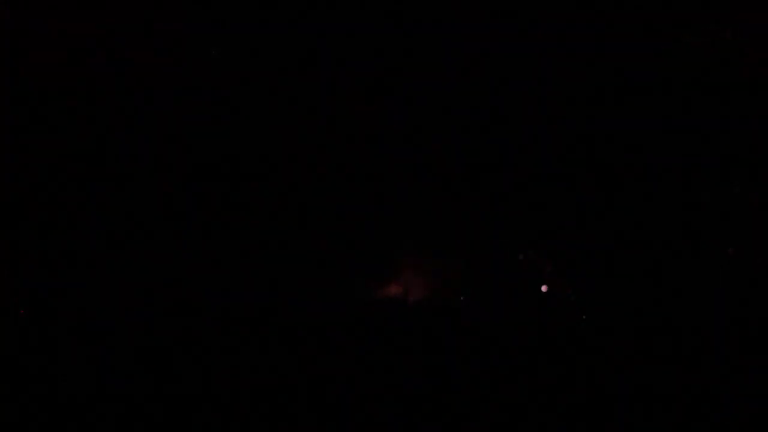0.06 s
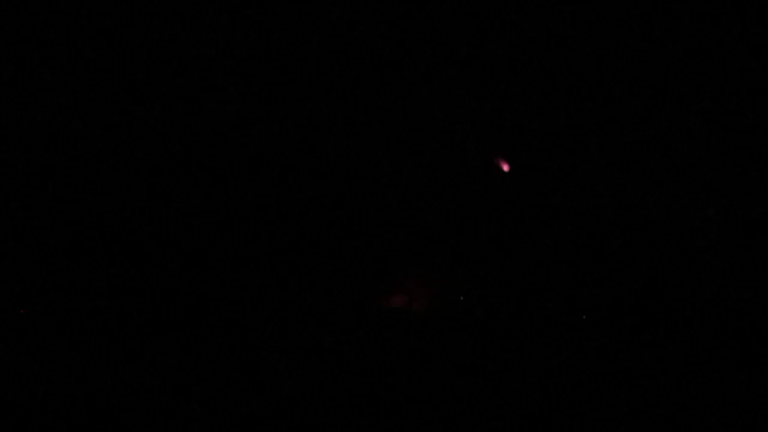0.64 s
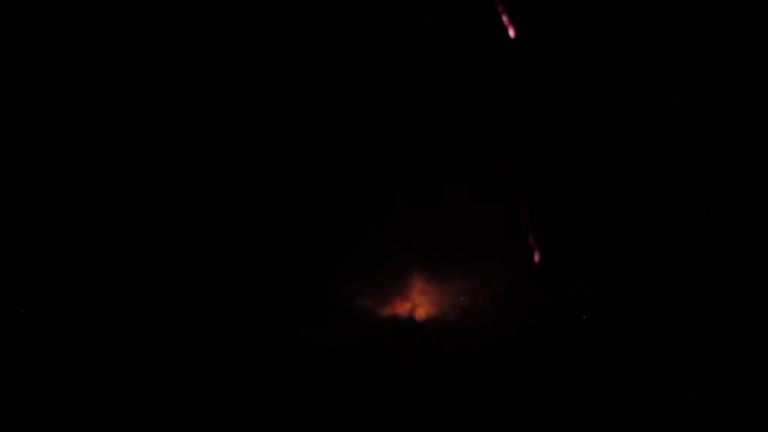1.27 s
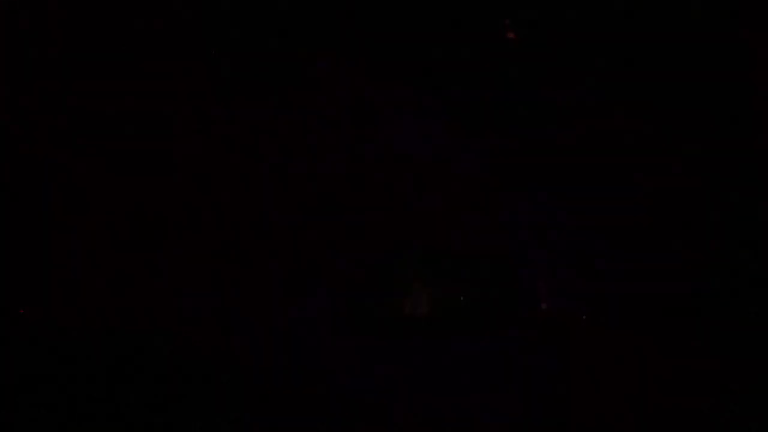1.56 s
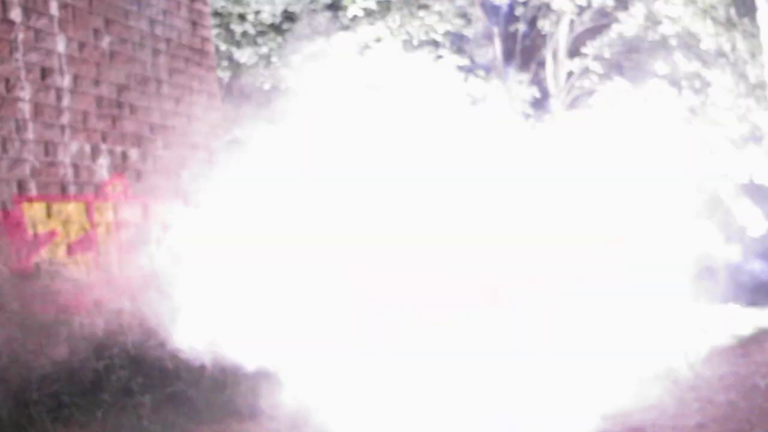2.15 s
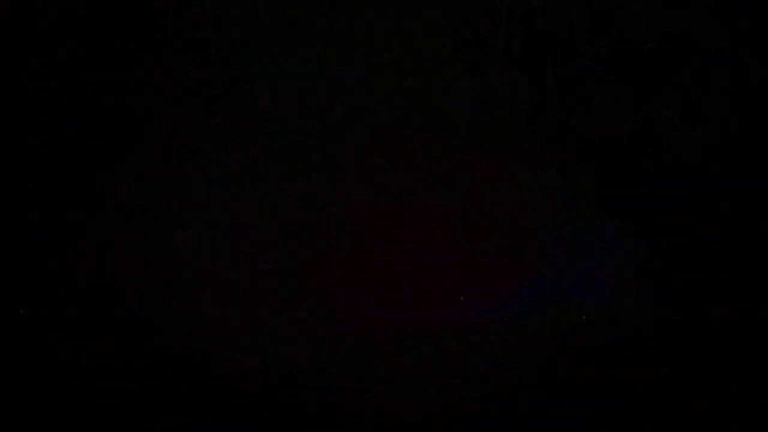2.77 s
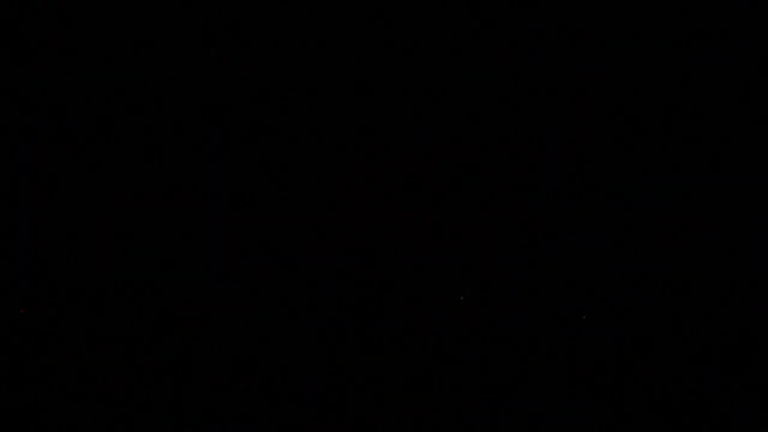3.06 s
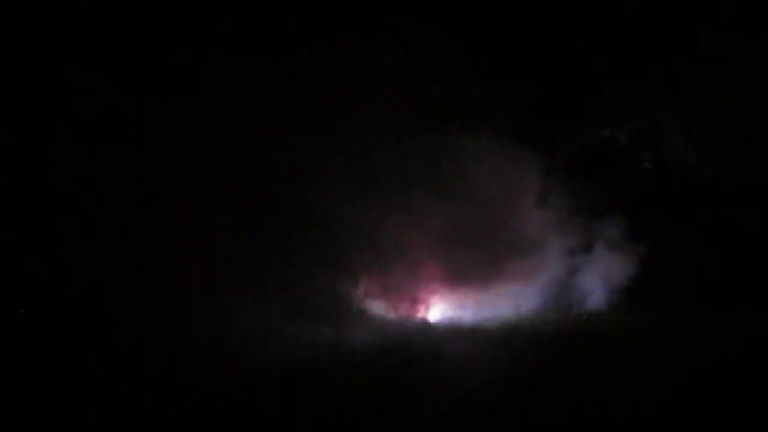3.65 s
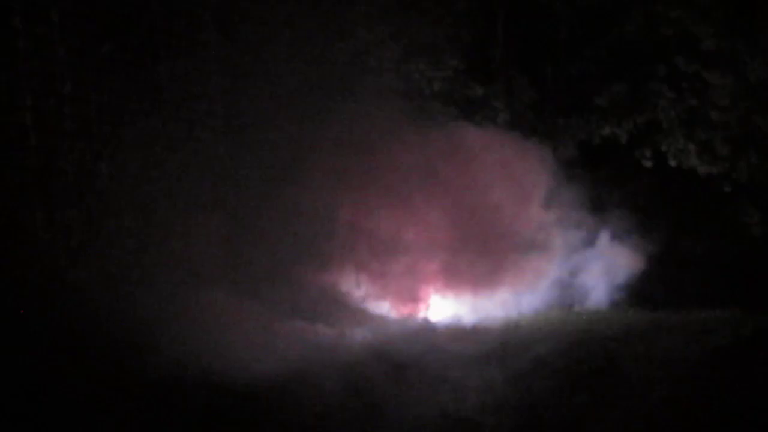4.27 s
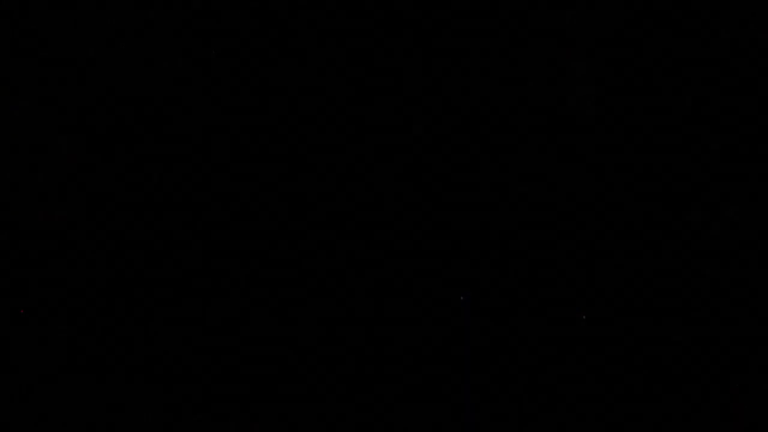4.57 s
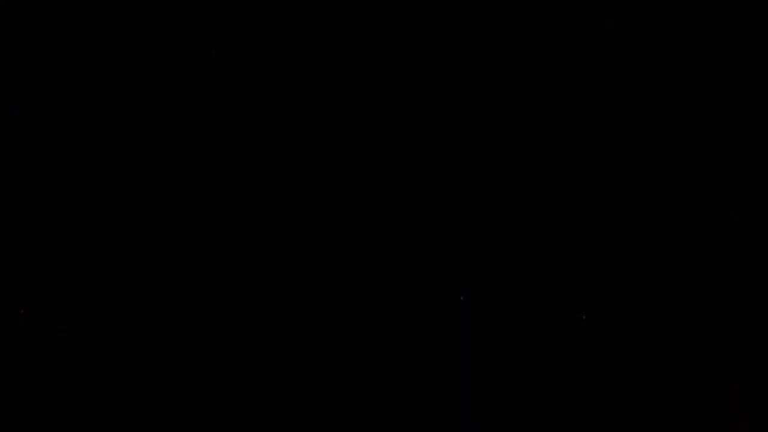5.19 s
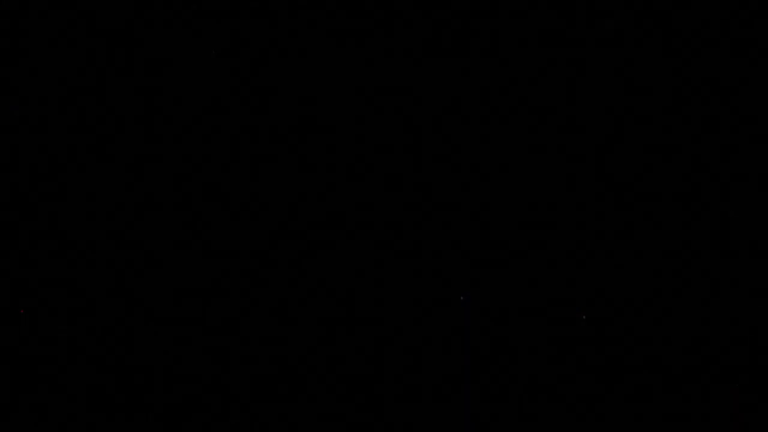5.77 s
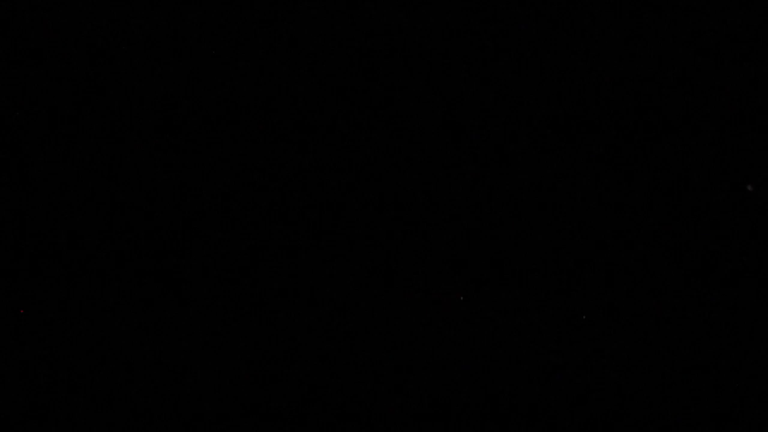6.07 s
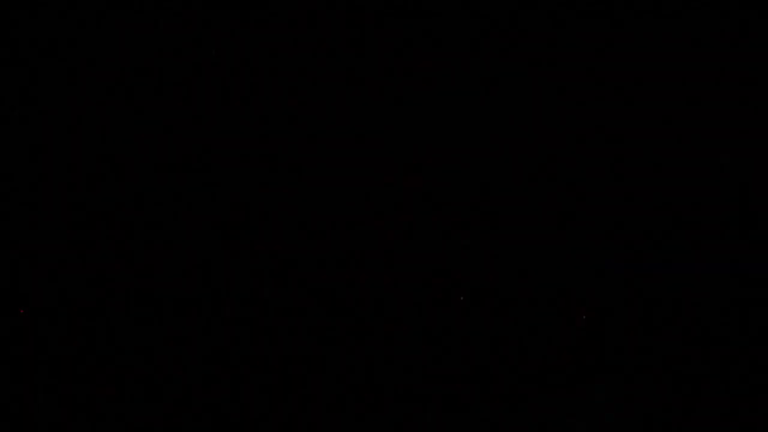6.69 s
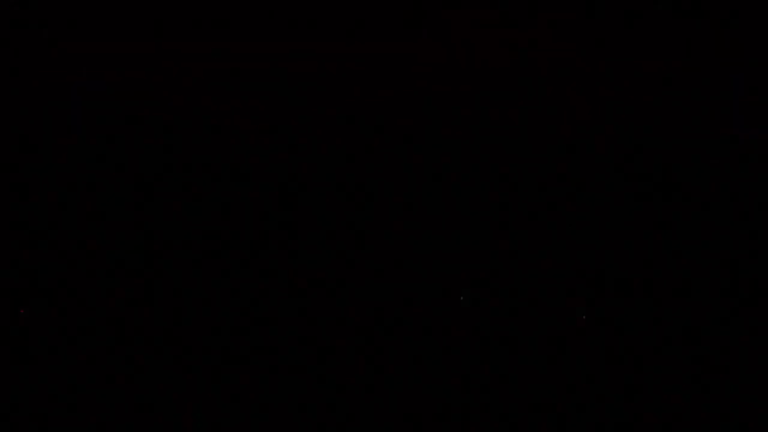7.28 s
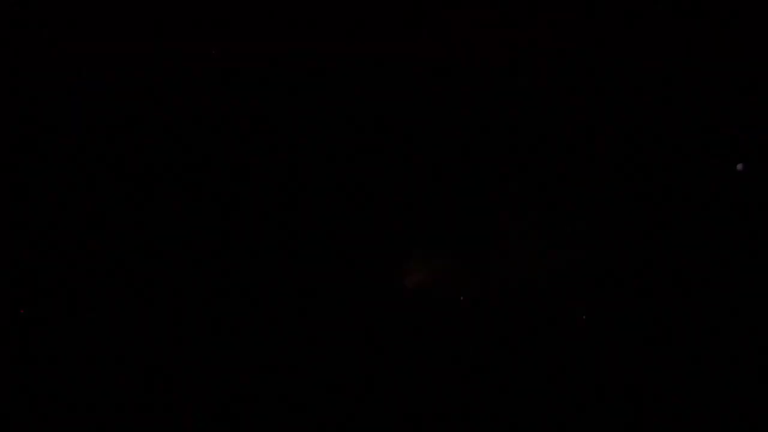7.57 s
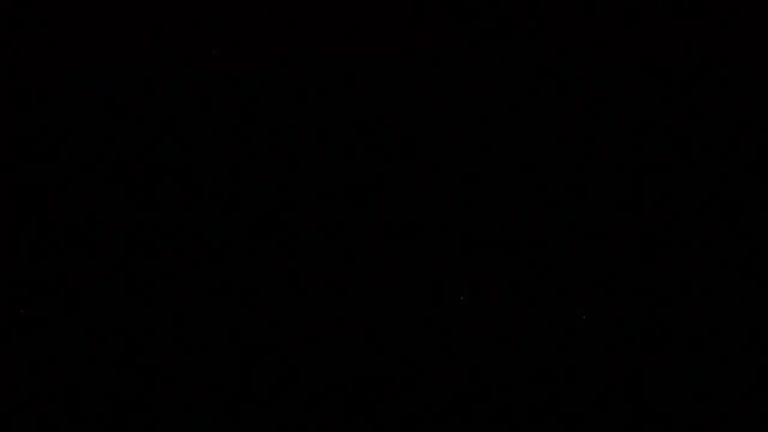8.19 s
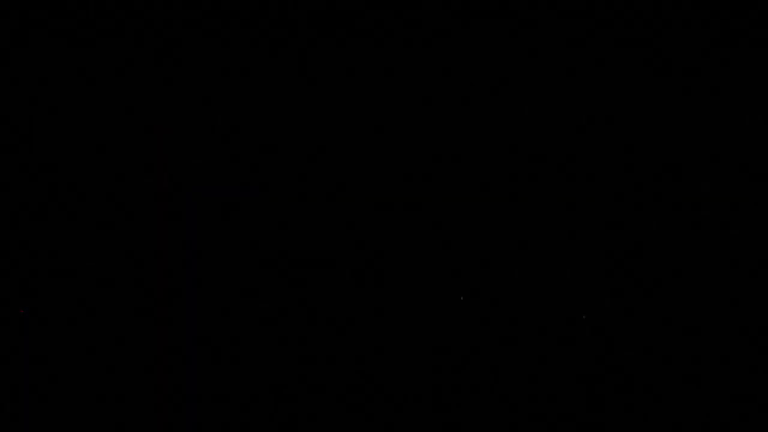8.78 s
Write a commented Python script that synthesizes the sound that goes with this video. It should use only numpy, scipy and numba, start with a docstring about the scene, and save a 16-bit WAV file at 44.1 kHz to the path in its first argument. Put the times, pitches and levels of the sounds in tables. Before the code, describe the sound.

A string of heavy firecrackers explodes in a clearing near trees and a house. The loud, sharp bangs come quickly and unevenly, each overloading the microphone into a harsh crash, followed by ringing echoes and a low distant roll. About halfway through they thin out, and a fuse hisses faintly between the last few blasts.

```python
"""A chain of heavy firecrackers is already going off at night in a clearing between a house and tall trees.
Each shock wave overloads a small camera's two microphones, which flatten it into a harsh, held crash.
Within hundredths of a second a ribbed surface adds a brief falling sweep; dense scatter from the trees
rings on, and a long low roll returns from far away. After four and a half seconds the bangs thin out,
and the fuse hisses in the gaps between the last few."""
import sys
import numpy as np
from scipy import signal
from scipy.fft import rfft, irfft, next_fast_len
from scipy.io import wavfile
from numba import njit

SR = 44100
rng = np.random.default_rng(int(sys.argv[2]) if len(sys.argv) > 2 else 0)


def materialize(psi):
    """Save the field psi as 16-bit PCM at rate SR to the path in sys.argv[1].

    A 1-D psi becomes a single channel; in a 2-D psi each row is a channel.
    """
    bounded = np.clip(np.atleast_2d(psi).T, -1, 1)
    quanta = np.round(bounded * 32767).astype(np.int16)
    wavfile.write(sys.argv[1], SR, quanta)


N = 394254
SIZE = next_fast_len(N + 8192)
FREQ = np.arange(SIZE // 2 + 1) * SR / SIZE
TIME = np.arange(N) / SR

# noise spectrum of the burning fuse and night air: f/Hz, spectral density level/dB
HISS_SPECTRUM = [(30, -93), (130, -91), (600, -104), (1500, -108.5), (3300, -108), (5000, -103.8),
                 (7000, -109), (9000, -124.5), (12000, -132.5), (16000, -140)]
# reverberation of the surroundings: f/Hz, tree scatter level/dB, tree T60/s, far roll level/dB
ECHO_BANDS = [(35, -47.5, 1.36, -71.5), (80, -48, 1.27, -60), (172, -42, 1.08, -58),
              (322, -44.5, 1.16, -65), (624, -49.5, 1.244, -70), (1074, -48, 1.074, -76),
              (1920, -45.5, 0.79, -79.5), (3700, -48.5, 0.87, -85.5), (5090, -46.5, 0.91, -89),
              (7200, -54.5, 0.76, -114), (8260, -62.5, 0.67, -112), (10930, -78, .59, -130),
              (15000, -91, .45, -145)]
# low reflections from the house and the edge of the wood: delay/s, level over the scatter/dB, spread/s
REFLECTIONS = [(.038, 4, 0.0046), (.056, 8, 0.0032), (.122, 3, 0.013), (.196, 1.5, 0.02),
               (.275, -4.5, 0.017)]
# one row per firecracker: t/s, level/dB, low boom over the crack/dB
BLASTS = [(-.23, -3, 6.5), (0.0768, -2, 2), (0.2775, 7.5, 7.5), (0.369, -2.5, 2), (0.9149, 0, 4),
          (1.481, 4.2, 3.4), (1.589, -2.1, 6), (1.8935, -.7, 3), (2.1148, -4.5, 7), (2.2149, 2, 5),
          (2.43, 3, 3.5), (2.8039, -1.5, 3), (3.4168, .8, 4.3), (3.7429, -3, 3.5), (3.921, -6, 7.5),
          (3.974, -13, 23.5), (4.2892, 0.5, 8), (4.3711, -2.5, 3), (4.4536, -5, -1.5), (6.2411, 0, 2.5),
          (6.7993, 4, 5), (6.875, -10, 6.5), (8.4827, 0, 5.5)]
# treble difference between the two microphone ports: f/Hz, left minus right level/dB
PORT_DIFFERENCE = [(100, -.2), (2400, 0.1), (4400, 4), (6000, -0.5), (8100, -16), (11000, -10), (15000, -1)]
# frequency response of the camera after the overload: f/Hz, gain/dB
CAMERA_RESPONSE = [(50, -7), (500, 1.5), (1500, 0.5), (3300, 0), (5000, 1.5), (7000, 3), (9000, -1),
                   (12000, -2), (16000, -5.5)]


def undb(db):
    """Decibel law: 20 dB is a tenfold amplitude."""
    return 10 ** (np.asarray(db) / 20)


def over_freq(points):
    """Interpolation of (f/Hz, value) points on a logarithmic frequency axis."""
    hz, value = np.transpose(points)
    return np.interp(np.log(FREQ + 1), np.log(hz), value)


def minimum_phase(db):
    """Causality: a minimum-phase response of the given gain lets nothing sound ahead of a shock."""
    cepstrum = irfft(np.log(undb(db)), SIZE)
    cepstrum[1:SIZE // 2] *= 2
    cepstrum[SIZE // 2 + 1:] = 0
    return np.exp(rfft(cepstrum))


def wander(t, rate):
    """Random modulation: Gaussian values, `rate` a second, joined by lines."""
    knots = rng.standard_normal(4096)
    return np.interp(t * rate, np.arange(len(knots)), knots)


def left_delay(lag_s=.00006):
    """Path difference: sound from the firecrackers reaches the left port later, a linear phase lag."""
    return np.exp(-2j * np.pi * FREQ * lag_s)


def diffuse_field(frontal=0.077, port_gap_m=0.037, sound_speed=343):
    """Spatial coherence: spectra of white noise at two close ports, which long waves reach alike."""
    coherence = frontal * left_delay() + (1 - frontal) * np.sinc(2 * FREQ * port_gap_m / sound_speed)
    right, independent = rfft(rng.standard_normal((2, SIZE))) * np.sqrt(SR / 2)
    left = coherence * right + np.sqrt(np.maximum(1 - np.abs(coherence) ** 2, 0)) * independent
    return np.array([left, right])


def fuse(spark_db=17, spark_spread_db=4.0, spark_low_hz=9000, count=220, rise_db_per_s=1.21):
    """Combustion noise: a faint, growing hiss over the night air, with ticks of sparks and scraps."""
    ticks = np.zeros(SIZE)
    tick_db = spark_db + spark_spread_db * np.minimum(rng.exponential(size=count), 4)
    ticks[rng.integers(0, N, count)] = undb(tick_db) * np.sqrt(SR / 2)
    sparks = rfft(ticks) * 1j * FREQ / (spark_low_hz + 1j * FREQ)
    spectrum = (diffuse_field() + sparks) * undb(over_freq(HISS_SPECTRUM))
    return irfft(spectrum, SIZE)[:, :N] * undb(rise_db_per_s * TIME)


def bell(x, centre, spread):
    """Gaussian curve with a peak of one."""
    return np.exp(-.5 * ((x - centre) / spread) ** 2)


def decay(age, t60):
    """Exponential reverberant decay: power falls by 60 dB in t60 seconds."""
    return 10 ** (-6 * age / t60)


def far_roll(age, build_s=.07, t60=3.86, swell_db=-2, swell_delay_s=0.88, swell_spread_s=0.08):
    """Long-path reflection: power envelope of the roll from distant slopes, one adding a soft swell."""
    swell = undb(2 * swell_db) * bell(age, swell_delay_s, swell_spread_s)
    return (1 - np.exp(-age / build_s)) * decay(age, t60) * (1 + swell)


def low_reflections(age, onset_s=.031, early_db=-7):
    """Discrete reflection: the house and the wood's edge return low-frequency power late, in lumps."""
    lumps = sum(undb(2 * db) * bell(age, delay, spread) for delay, db, spread in REFLECTIONS)
    return np.where(age < onset_s, undb(2 * early_db), 1) + lumps


def echoes(build_s=0.0053, near_db=5, near_t60=0.63, t60_growth_per_s=0.028, roll_db=4.5, low_hz=900,
           boom_hz=538, octaves_per_db=.020, boom_octaves=0.54, flicker_db=2.0, flicker_hz=28):
    """Multiple scattering: returns from near trunks, the wood behind and far slopes add in power."""
    t = TIME[::32]
    start, blast_db, boom_db = np.transpose(BLASTS)[:, :, None]
    boom_centre = boom_hz * 2 ** (octaves_per_db * boom_db)
    age = np.maximum(t - start, 0)
    build = (1 - np.exp(-age / build_s)) ** 2
    trunks = undb(2 * near_db) * decay(age, near_t60)
    far, lumps = far_roll(age), low_reflections(age)
    noise, out = diffuse_field(), np.zeros((2, N))
    centres = [row[0] for row in ECHO_BANDS]
    shared_flicker = wander(t, flicker_hz)
    for (hz, trees_db, t60, far_db), band_weights in zip(ECHO_BANDS, np.eye(len(ECHO_BANDS))):
        # a slower-burning charge puts more of its energy into a low boom
        strength = undb(blast_db + boom_db * bell(np.log2(hz / boom_centre), 0, boom_octaves))
        wood = decay(age, t60 * (1 + t60_growth_per_s * start))  # later bangs ring a little longer
        trees = undb(2 * trees_db) * build * (trunks + wood)
        low_share = 1 / (1 + (hz / low_hz) ** 4)
        scatter = strength ** 2 * trees * (1 - low_share + low_share * lumps)
        roll = undb(2 * (blast_db + roll_db + far_db)) * far
        flicker = undb(flicker_db * (.5 * shared_flicker + 0.59 * wander(t, flicker_hz)))
        envelope = np.sqrt(np.sum(scatter + roll, axis=0)) * flicker
        band = irfft(noise * over_freq(list(zip(centres, band_weights))), SIZE)[:, :N]
        out += band * np.interp(TIME, t, envelope)
    return out


def rib_sweeps(start_hz=1750, fall_s=.058, begin_s=0.0093, end_s=.066, edge_s=0.0034, smear_hz=650,
               sweep_db=-8.5, db_per_boom_db=-0.65):
    """Repetition pitch: ribs return each shock in turn, ever further apart, as a rough falling sweep."""
    out = np.zeros(N)
    t = np.arange(SR // 10) / SR
    phase = 2 * np.pi * start_hz * fall_s * (1 - np.exp(-t / fall_s))
    gate = (np.tanh((t - begin_s) / edge_s) - np.tanh((t - end_s) / edge_s)) / 2
    for start, db, boom_db in BLASTS:
        tone = wander(t, smear_hz) * np.sin(phase) + wander(t, smear_hz) * np.cos(phase)
        gain = undb(db + sweep_db + db_per_boom_db * boom_db)  # a sharper crack has a clearer sweep
        i = int(start * SR)
        if i >= 0:
            out[i:i + len(t)] += gain * (gate * tone)[:N - i]
    return out


def shocks(push_db=11, push_s=.0017, bounce_db=-5, spread_s=.009, arrivals=5,
           ring_db=31, ring_s=.00022, ring_range_hz=(2800, 7200)):
    """Blast waves: a sudden overpressure, then slower suction, reflected by the ground and house wall."""
    out = np.zeros(N)
    t = np.arange(SR // 20) / SR
    for (start, db, _), paths in zip(BLASTS, rng.random((len(BLASTS), arrivals, 2))):
        for k, (place, width) in enumerate(paths):
            lag = (k > 0) * (0.0017 + spread_s * place * k / arrivals)  # k = 0 is the direct path
            length = push_s * (0.74 + 0.39 * width)
            blast = undb(push_db) * (1 - t / length) * np.exp(-t / length)
            # the steep front rings the microphone port
            ring_hz = np.interp(width, [0, 1], ring_range_hz)
            ring = undb(ring_db) * np.sin(2 * np.pi * ring_hz * t) * np.exp(-t / ring_s)
            i = int((start + lag) * SR)
            if i >= 0:
                out[i:i + len(t)] += undb(db + bounce_db * np.sqrt(k)) * (blast - ring)[:N - i]
    return out


def scene():
    """Superposition: frontal and diffuse pressure add at two ports, each with its own treble colour."""
    frontal = rfft(shocks() + rib_sweeps(), SIZE)
    pressure = np.array([frontal * left_delay(), frontal]) + rfft(echoes() + fuse(), SIZE)
    ports = np.array([minimum_phase(side * over_freq(PORT_DIFFERENCE) / 2) for side in (1, -1)])
    return irfft(pressure * ports, SIZE)[:, :N]


@njit
def follow(x, attack, release):
    """Envelope detection: a level that rises fast and sinks slowly."""
    out, level = np.empty(len(x)), x.max() / 2
    for i in range(len(x)):
        level += (x[i] - level) * (attack if x[i] > level else release)
        out[i] = level
    return out


def record(dry, ceiling_db=-11, hardness=12, low_cut_hz=360, rumble_db=-6, rumble_band_hz=(105, 480),
           attack_s=.003, release_s=1.76, threshold=.3, squeeze=.55, top_hz=16000):
    """Saturation flattens each bang; a low cut, the camera's tone, gain control and a top cut follow."""
    drive = dry / undb(ceiling_db)
    saturated = drive / (1 + np.abs(drive) ** hardness) ** (1 / hardness)
    low_cut = 1j * FREQ / (low_cut_hz + 1j * FREQ)
    tone = minimum_phase(over_freq(CAMERA_RESPONSE))
    sound = irfft(rfft(saturated, SIZE) * low_cut * tone, SIZE)[:, :N]
    # the overload is asymmetric: each channel rectifies a little of its crash into a rumble
    rumble_band = signal.butter(2, rumble_band_hz, "bandpass", fs=SR, output="sos")
    sound = sound + undb(rumble_db) * signal.sosfilt(rumble_band, sound ** 2)
    level = follow(np.abs(saturated).max(axis=0), 1 / (attack_s * SR), 1 / (release_s * SR))
    sound = sound * undb(ceiling_db) / np.maximum(level, threshold) ** squeeze
    top_cut = signal.ellip(10, .2, 80, top_hz, fs=SR, output="sos")
    return signal.sosfilt(top_cut, np.clip(sound, -1, 1))


dry = scene()
out = record(dry)
materialize(out)
```